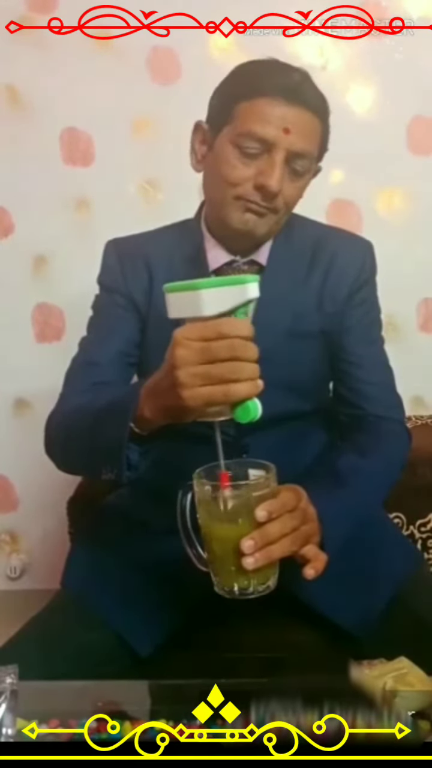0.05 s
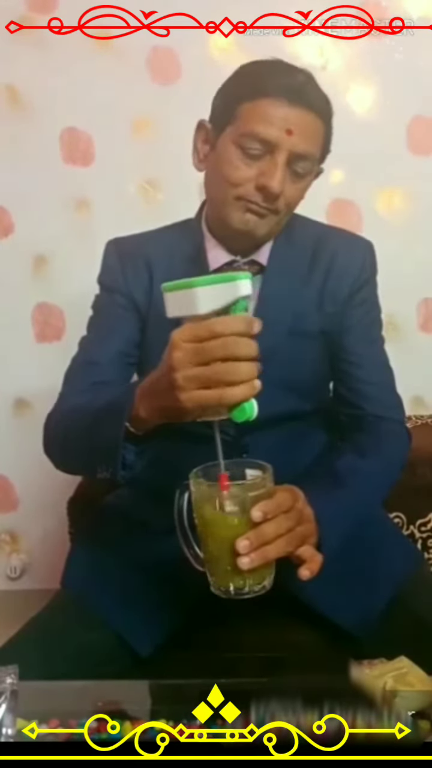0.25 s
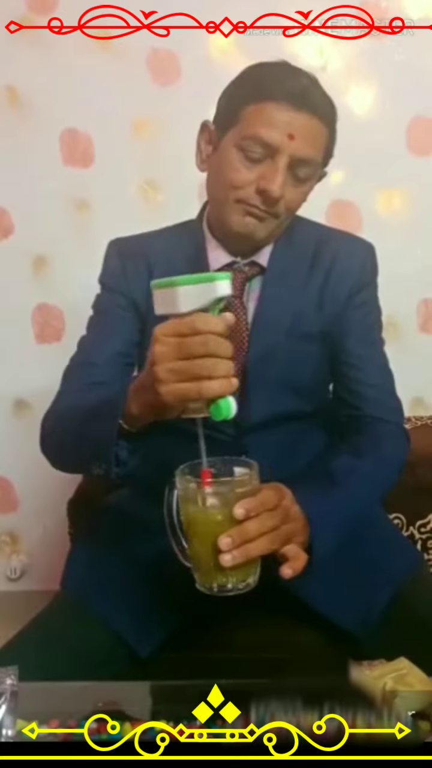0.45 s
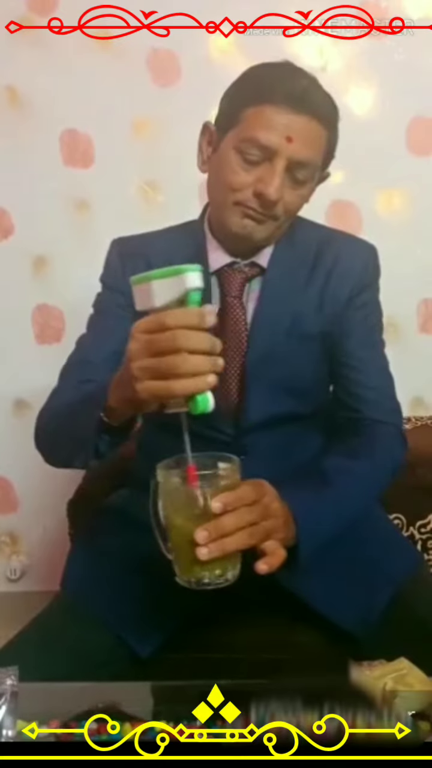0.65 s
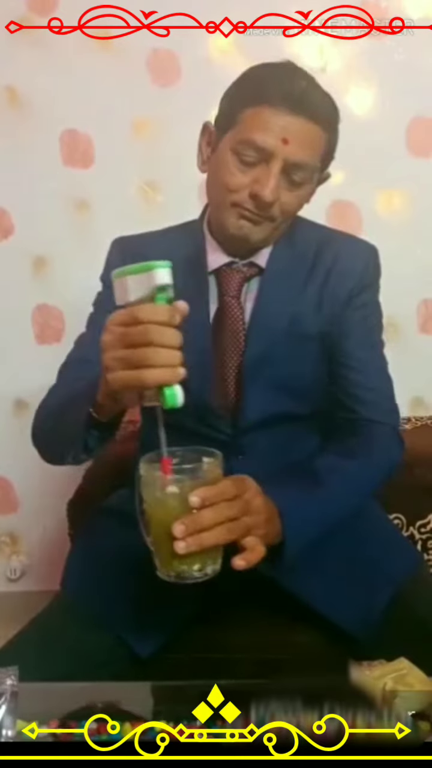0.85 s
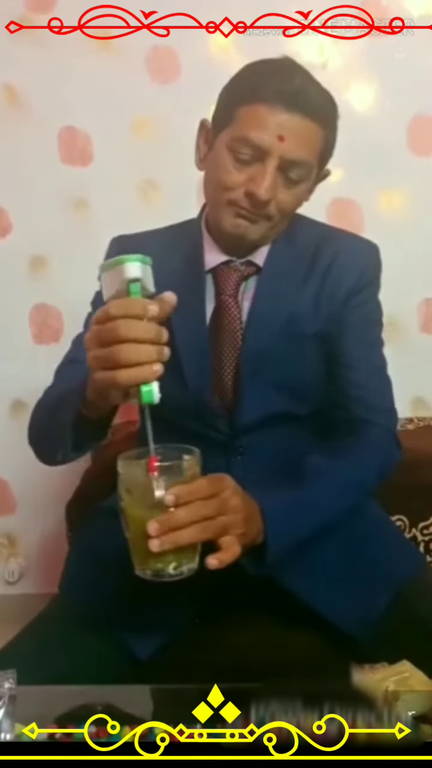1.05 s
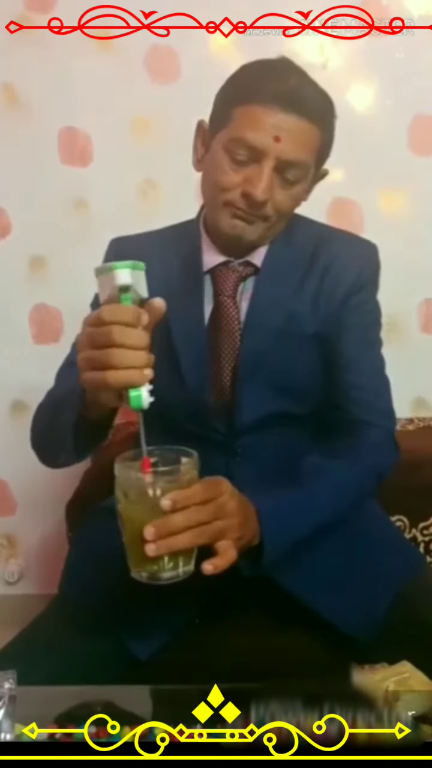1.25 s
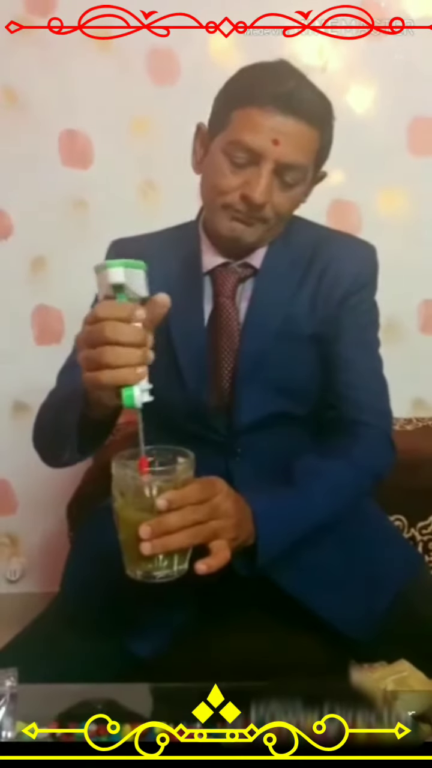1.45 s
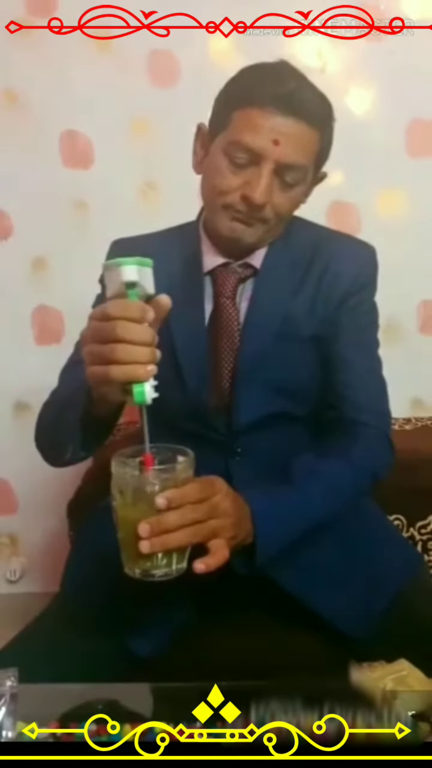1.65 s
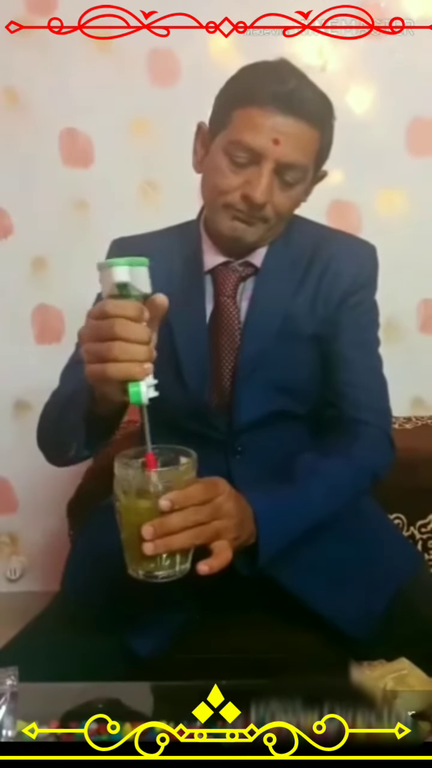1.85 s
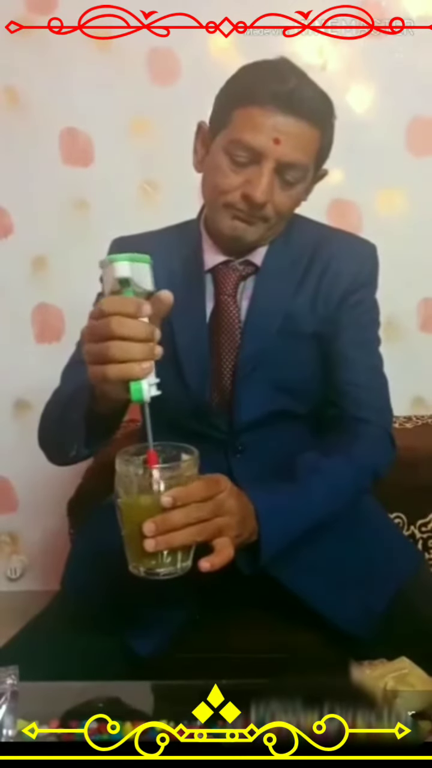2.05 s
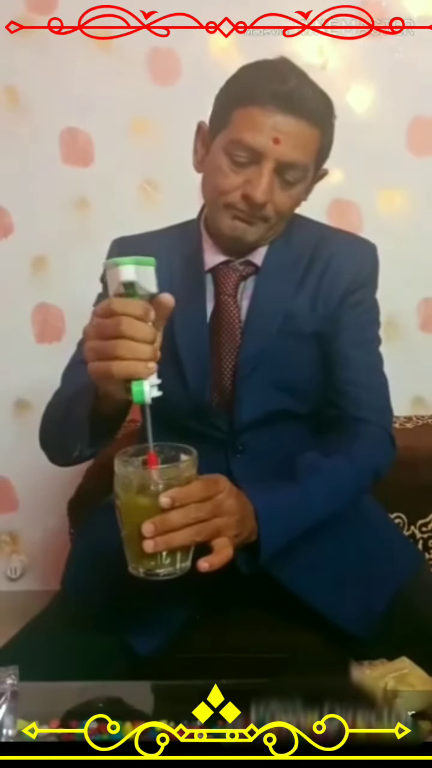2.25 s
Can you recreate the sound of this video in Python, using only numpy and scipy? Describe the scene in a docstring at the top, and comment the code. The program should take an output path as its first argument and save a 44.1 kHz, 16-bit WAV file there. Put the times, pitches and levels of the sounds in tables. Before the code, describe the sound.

A hand-squeezed whisk rasps in rhythmic bursts, clicking and knocking inside a glass mug.

```python
"""Hand whisk in a glass mug

A hand-squeezed whisk turns in a glass mug in a small furnished room. Each squeeze drives plastic
gear teeth, whose impacts excite the body's modes, faster and louder with the push. The lever clicks
at its stops, bubbles ring as they burst, the whisk knocks the glass, and the room hums softly."""
import sys
import numpy as np
from scipy import signal
from scipy.fft import rfft, irfft, next_fast_len
from scipy.io import wavfile

SR = 44100
rng = np.random.default_rng(int(sys.argv[2]) if len(sys.argv) > 2 else 0)


def generate_wav(signal):
    """Clip the signal to [-1, 1] and save it as 16-bit WAV at the path in sys.argv[1]."""
    frames = np.transpose(np.atleast_2d(signal))
    scaled = np.clip(frames, -1, 1) * 32767
    pcm = np.round(scaled).astype(np.int16)
    wavfile.write(sys.argv[1], SR, pcm)


N = 101429

# push on the lever, as the gears sound it: time_s, level_db, low_mode_lift_db
LEVER_PUSH = [(0, -41, 11), (0.031, -42, 4), (.075, -54.5, 11), (.175, -53, 11), (.22, -38.5, 6.5),
              (0.259, -31, 0.5), (.3, -32, 4), (.335, -41, 4.5), (0.41, -36, 2), (0.449, -44.5, -1),
              (0.486, -53.5, 5), (.55, -53.5, 3), (0.598, -36, 2), (0.658, -31, 6), (.72, -34.5, 1),
              (.76, -38, 9.5), (.81, -36.5, 3.5), (.87, -54, 2.5), (0.956, -52, 10), (0.979, -39.5, 4.5),
              (1.079, -35, 9), (1.14, -35.5, 8), (1.255, -38.5, 7), (1.309, -53, -10), (1.4, -55.5, 4.5),
              (1.448, -39, 0), (1.499, -32, 2.5), (1.561, -34, 6), (1.629, -46, -2.5), (1.68, -36.5, 7.5),
              (1.721, -46.5, -20.5), (1.769, -39.5, 8), (1.841, -48.5, -23), (1.89, -39, 3),
              (1.94, -31, 5.5), (1.995, -31, 1.5), (2.039, -39.5, 1), (2.129, -51, 4), (2.162, -46.5, -8),
              (2.234, -62, -10.5), (2.259, -44.5, 3.5), (2.3, -48.5, 9.5)]
# modes of the plastic body: pitch_hz, level_db, t60_s
BODY_MODES = [(755, -3.5, 0.026), (1045, -4.5, 0.011), (1250, -3.5, 0.02), (1441, -10, 0.028),
              (1764, -12, 0.036), (2117, 0.5, 0.015), (2426, 1.5, 0.0093), (3030, -3, 0.037),
              (3182, -3.5, 0.03), (3544, -3, 0.011), (3763, -3.5, 0.0083), (4674, -5.5, 0.042),
              (5280, -9, 0.031), (6470, -17, 0.055)]
# broadband crack of a tooth or a knock: frequency_hz, gain_db
CRACK_SPECTRUM = [(1000, -25), (2100, 1), (3600, -7.5), (5000, -12.5), (7500, -16), (10000, -52),
                  (15500, -28)]
# background noise of the room: frequency_hz, density_db
ROOM_SPECTRUM = [(25, -17), (60, -16.5), (100, -4), (160, -1.5), (300, -3), (600, -5.5), (2000, -7),
                 (4000, -15), (7000, -29.5), (15500, -37)]
# likeness of that noise at the two microphones: frequency_hz, coherence_ratio
ROOM_COHERENCE = [(60, 0.91), (200, 0.9), (400, 0.59), (1000, 0.25)]
# lever clicks: time_s, level_db, favoured_hz, snap_db, length_s
LEVER_CLICKS = [(0.01, -26, 2920, -47, 0.0012), (.124, -24, 2670, -41, .003),
                (0.364, -19.5, 1520, -46.5, 0.003), (0.378, -21.5, 2270, -33.5, 0.0088),
                (.395, -12.5, 3020, -47, 0.00067), (.396, -12.5, 1400, -37.5, 0.0024),
                (0.404, -28, 2680, -43, 0.0013), (.422, -18, 2680, -50, 0.0088),
                (.501, -22, 3340, -36.5, 0.0042), (0.777, -17.5, 2980, -31.5, 0.0051),
                (0.788, -18.5, 2800, -35, 0.0051), (.898, -25, 970, -73, 0.0024),
                (.912, -25, 2056, -39, 0.0033), (1.224, -17, 2440, -29, 0.0045),
                (1.34, -26, 2440, -38, 0.0037), (1.659, -17, 3030, -51, 0.0019),
                (1.661, -17.5, 1210, -56.5, 0.0023), (1.678, -26, 1320, -60, 0.0096),
                (1.75, -13, 2360, -33.5, 0.0034), (1.742, -21, 2305, -45.5, 0.004),
                (1.795, -27.5, 2420, -38.5, 0.0043), (2.143, -14, 1625, -54, 0.0012),
                (2.249, -21.5, 3427, -43, 0.0032), (2.272, -22, 1259, -70, 0.0029)]
# bright snap of a click: frequency_hz, gain_db
SNAP_SPECTRUM = [(3000, 10), (4700, 6), (6500, -9), (8500, -17), (11000, -32), (15500, -41)]
# bubbles bursting in the drink: start_s, level_db, pitch_hz
BUBBLE_BURSTS = [(.086, -33, 584), (.1, -31, 560), (.124, -30, 828), (.9, -35.5, 514), (1.258, -31, 506),
                 (1.339, -31, 760), (2.15, -33.5, 726), (2.285, -31, 657)]
# knocks of the whisk on the glass: time_s, level_db, favoured_hz
GLASS_KNOCKS = [(0.597, -16.5, 2140), (0.620, -12.5, 1940), (0.634, -18, 2250), (0.652, -14, 1320),
                (0.65, -19, 3660), (0.661, -8.5, 1080), (0.673, -9, 1050), (0.683, -6, 1130),
                (0.712, -15, 1120), (0.967, -18.5, 3030), (0.982, -15, 3000), (0.997, -12, 2700),
                (1.042, -14, 3000), (1.062, -11.5, 2710), (1.077, -17.5, 2166), (1.096, -13.5, 2105),
                (1.104, -18.5, 2090), (1.116, -20, 2000), (1.162, -20, 1490), (1.186, -23.5, 3360)]
# modes of the filled glass: pitch_hz, level_db, t60_s
GLASS_MODES = [(1059, -7, 0.086), (1152, -11.5, 0.065), (1240.2, -15, 0.057), (1560, -5.5, 0.069),
               (1823, -5, 0.026), (2065, 0.5, 0.017), (2172, -7.5, .07), (2696, -20, 0.18),
               (3310, 2, 0.023), (3810, -1, 0.014), (4542, 3, 0.012)]
# bias toward the left microphone, which faces the mixer: frequency_hz, left_over_right_db
LEFT_BIAS = [(700, 1), (1300, 4.5), (2300, 11.5), (3400, 6), (4700, 13.5)]

MID_PUSH_DB = -35  # tooth rate and whirr pitch are given at this push
TEETH_PER_S, TEETH_PER_S_PER_DB, JITTER_TEETH = 200, 6, .07
WHIRR_HZ, WHIRR_HZ_PER_DB, WHIRR_WIDTH_OCT, WHIRR_DB = 3560, 40, .13, 9
TOOTH_SPREAD_DB, MODE_SPREAD_DB, RIGHT_SPREAD_DB = 2, 2.5, 8.5
FLIP_SHARE = .2  # share of teeth that ring a mode in opposite phase on the right
GEAR_DB, FRICTION_DB = -3, -4
CRACK_DB, CRACK_T60_S, CRACK_PAN_DB = -6, .03, 4
BUBBLE_T60_S, BUBBLE_ATTACK_S, BUBBLE_RISE_PER_S = .041, .0022, 2.5
KNOCK_S, CLICK_NOISE_GAIN = .00058, .3
BASS_CUT_HZ, SOFT_CONTACT_HZ = 671, 5200  # the small mixer radiates no bass; plastic contacts are soft
ROOM_T60_S, ROOM_DB, WALL_CUT_HZ = .11, -9.5, 28000
LEFT_LAG_S, CUTOFF_HZ = .00009, 16600


def from_db(db):
    """Amplitude grows tenfold for every 20 dB."""
    return 10 ** (np.asarray(db) / 20)


def unit_rms(x):
    """Normalisation to unit mean power."""
    return x / np.sqrt(np.mean(x ** 2) + 1e-20)


def at_hz(table, hz):
    """Interpolation on a logarithmic frequency axis."""
    frequencies, values = np.transpose(table)
    return np.interp(np.log(hz), np.log(frequencies), values)


def pan(db):
    """A level difference, split evenly into left and right gains."""
    return from_db([[db / 2], [-db / 2]])


def colour(x, spectrum):
    """Filter-bank shaping: each half-octave band takes the spectrum's gain at its centre."""
    low_hz, high_hz = spectrum[0][0], spectrum[-1][0]
    edges = low_hz * 2 ** np.arange(0, np.log2(high_hz / low_hz) + .4, .5)
    out = 0
    for k, (lo, hi) in enumerate(zip(edges, edges[1:])):
        band = signal.butter(2, [lo, min(hi, .45 * SR)], "band", fs=SR, output="sos")
        out += (-1) ** k * from_db(at_hz(spectrum, np.sqrt(lo * hi))) * signal.sosfilt(band, x + 1e-18)
    return out


def resonate(force, hz, t60):
    """A damped oscillator, driven through a soft contact that low-passes the force."""
    decay, angle = from_db(-60 / (t60 * SR)), 2 * np.pi * hz / SR
    softened = signal.sosfilt(signal.butter(2, SOFT_CONTACT_HZ, fs=SR, output="sos"), force + 1e-18)
    return signal.lfilter([0, np.sin(angle)], [1, -2 * decay * np.cos(angle), decay ** 2], softened)


def short_clicks(time_s, gains, length_s, hz=None):
    """Amplitude envelopes: noise bursts that rise and fade quickly, plus a tone at hz if given."""
    lag = np.arange(-400, 400)
    width = np.clip(np.broadcast_to(length_s, len(time_s)), 1e-4, .008)[:, None] * SR / 2
    envelope = np.exp(-np.abs(lag) / width)
    noise = rng.standard_normal((len(time_s), len(lag)))
    if hz:
        noisy_tone = np.cos(2 * np.pi * hz * lag / SR) + CLICK_NOISE_GAIN * np.sqrt(width) / 2 * noise
        bursts = 2 * envelope * noisy_tone / envelope.sum(axis=1, keepdims=True)
    else:
        bursts = envelope * noise / np.sqrt(np.sum(envelope ** 2, axis=1, keepdims=True))
    at = np.clip((time_s * SR).astype(int)[:, None] + lag, 0, N)
    out = np.zeros((2, N + 1))
    for side in range(2):
        np.add.at(out[side], at, bursts * gains[side][:, None])
    return out[:, :N]


def strike(modes, time_s, db, favoured_hz, length_s, focus_db_per_oct):
    """Modal excitation: a blow drives every mode, most strongly near its favoured pitch."""
    out = 0
    for hz, mode_db, t60 in modes:
        shared, right = rng.standard_normal((len(time_s), 2)).T
        level_db = db + mode_db - focus_db_per_oct * np.abs(np.log2(hz / favoured_hz)) + shared
        gains = from_db([level_db, level_db + RIGHT_SPREAD_DB / 2 * right])
        out += pan(at_hz(LEFT_BIAS, hz)) * resonate(short_clicks(time_s, gains, length_s, hz), hz, t60)
    return out


def gear_rasp():
    """Forced vibration: tooth impacts and friction drive the body's modes; each tooth also cracks."""
    time_s, push_db, lift_db = np.transpose(LEVER_PUSH)
    t = np.arange(N) / SR
    push_db, lift_db = np.interp(t, time_s, push_db), np.interp(t, time_s, lift_db)
    whirr_hz = WHIRR_HZ + WHIRR_HZ_PER_DB * (push_db - MID_PUSH_DB)
    tooth_rate = np.clip(TEETH_PER_S + TEETH_PER_S_PER_DB * (push_db - MID_PUSH_DB), 50, 500)
    teeth_passed = np.cumsum(tooth_rate) / SR
    teeth = np.arange(1, 1200)
    count = len(teeth)
    uneven_teeth = teeth + JITTER_TEETH * rng.standard_normal(count)
    at = np.interp(uneven_teeth, teeth_passed, np.arange(N)).astype(int)
    strength = from_db(TOOTH_SPREAD_DB * rng.standard_normal(count)) * (teeth < teeth_passed[-1])
    body = 0
    for hz, mode_db, t60 in BODY_MODES:
        shared, right = np.clip(rng.standard_normal((count, 2)), -1.5, 1.5).T
        spread_db = MODE_SPREAD_DB * shared
        gains = from_db([spread_db, spread_db + RIGHT_SPREAD_DB * right])
        impacts = np.zeros((2, N))
        impacts[:, at] = strength * rng.choice([-1, 1], count) * gains
        impacts[1, at] *= np.where(rng.random(count) < FLIP_SHARE, -1, 1)
        friction_rms = from_db(FRICTION_DB) * np.sqrt(np.mean(impacts ** 2))
        friction = friction_rms * unit_rms(rng.standard_normal((2, N)))
        ringing = unit_rms(resonate(impacts + friction, hz, t60))
        lift_share = np.clip(np.log2(3300 / hz) / 1.5, 0, 1)
        # the whirr is a narrow emphasis that climbs with the push
        whirr_db = WHIRR_DB * np.exp(-(np.log2(hz / whirr_hz) / WHIRR_WIDTH_OCT) ** 2)
        level_db = mode_db + push_db + lift_share * lift_db + whirr_db
        body += from_db(level_db) * pan(at_hz(LEFT_BIAS, hz)) * ringing
    impulses = np.zeros(N)
    impulses[at] = strength
    envelope = signal.lfilter([1], [1, -from_db(-60 / (CRACK_T60_S * SR))], impulses)
    crack = unit_rms(colour(envelope * rng.standard_normal((2, N)), CRACK_SPECTRUM))
    return from_db(GEAR_DB) * (body / 2 + from_db(CRACK_DB + push_db) * pan(CRACK_PAN_DB) * crack)


def room_tone():
    """Partial coherence: steady noise is alike at the two microphones only in the bass."""
    hz = np.maximum(np.arange(N // 2 + 1) * SR / N, 10)
    mid, side = rfft(rng.standard_normal((2, N))) * from_db(at_hz(ROOM_SPECTRUM, hz))
    coherence = at_hz(ROOM_COHERENCE, hz)
    mid, side = np.sqrt(1 + coherence) * mid, np.sqrt(1 - coherence) * side
    return from_db(-49.5) * unit_rms(irfft(np.array([mid + side, mid - side]), N))


def lever_clicks():
    """Impact excitation: the lever meets its stops, ringing the body under a bright snap."""
    time_s, db, favoured_hz, snap_db, length_s = np.transpose(LEVER_CLICKS)
    body = strike(BODY_MODES, time_s, db, favoured_hz, length_s, focus_db_per_oct=26)
    snap_gain = from_db(snap_db + 29)
    snap = colour(short_clicks(time_s, [snap_gain, snap_gain], length_s), SNAP_SPECTRUM)
    return body + pan(db=11.8) * snap


def bubbles():
    """Bubble resonance: each burst is a damped sine whose pitch rises as it dies."""
    out = 0
    for start_s, db, hz in BUBBLE_BURSTS:
        age = np.maximum(np.arange(N) / SR - start_s, 0)
        envelope = (1 - np.exp(-age / BUBBLE_ATTACK_S)) * from_db(db - 60 * age / BUBBLE_T60_S)
        out += envelope * np.sin(2 * np.pi * hz * (age + BUBBLE_RISE_PER_S * age ** 2 / 2))
    return pan(db=2) * out


def glass_knocks():
    """Free vibration: the whisk's wires strike the mug with a crack and leave its modes ringing."""
    time_s, db, favoured_hz = np.transpose(GLASS_KNOCKS)
    crack_gain = from_db(db + 10)
    crack = colour(short_clicks(time_s, [crack_gain, crack_gain], 2 * KNOCK_S), CRACK_SPECTRUM)
    ringing = strike(GLASS_MODES, time_s, db - 5.5, favoured_hz, KNOCK_S, focus_db_per_oct=12)
    return ringing + pan(CRACK_PAN_DB) * crack


def reverberation(direct):
    """Repeated reflection: ten feedback delays a side, weaker and duller on every round trip."""
    size = next_fast_len(N + SR)
    hz = np.arange(size // 2 + 1) * SR / size
    wall = 1 / (1 + 1j * hz / WALL_CUT_HZ)
    out = []
    for channel, delays_s in zip(direct, rng.uniform(.008, .03, (2, 10))):
        loops = [from_db(-60 * s / ROOM_T60_S) * wall * np.exp(-2j * np.pi * hz * s) for s in delays_s]
        response = sum((-1) ** k * loop / (1 - loop) for k, loop in enumerate(loops))
        out.append(irfft(rfft(channel, size) * response, size)[:N])
    return np.array(out)


def scene():
    """Superposition of direct sound, reflections and room tone; the direct sound lags on the left."""
    bass_cut = signal.butter(6, BASS_CUT_HZ, "high", fs=SR, output="sos")
    left, right = signal.sosfilt(bass_cut, gear_rasp() + lever_clicks() + glass_knocks()) + bubbles()
    left = np.interp(np.arange(N) - LEFT_LAG_S * SR, np.arange(N), left)
    direct = np.array([left, right])
    return direct + from_db(ROOM_DB) * reverberation(direct) + room_tone()


def record(dry):
    """Band limiting: a steep low-pass removes the highest treble."""
    return signal.sosfilt(signal.cheby2(12, 70, CUTOFF_HZ, fs=SR, output="sos"), dry)


dry = scene()
out = record(dry)
generate_wav(out)
```